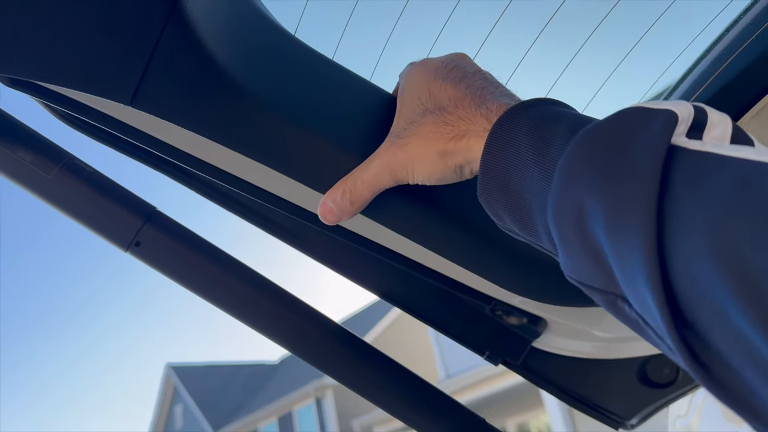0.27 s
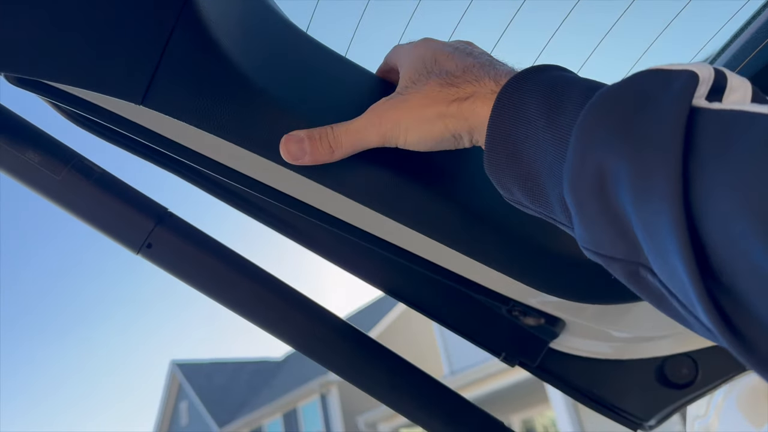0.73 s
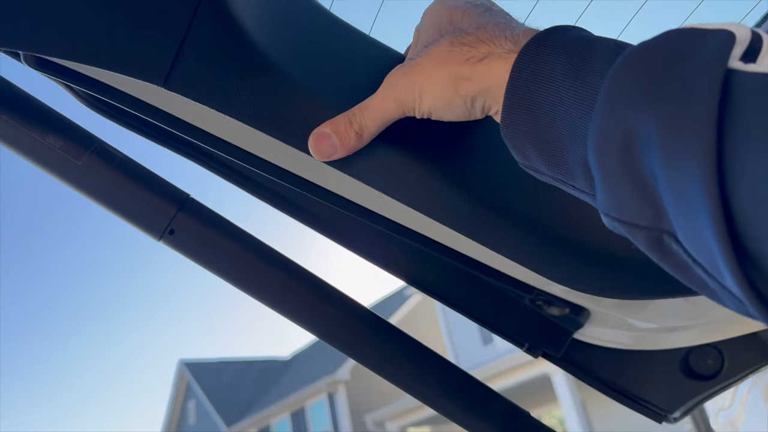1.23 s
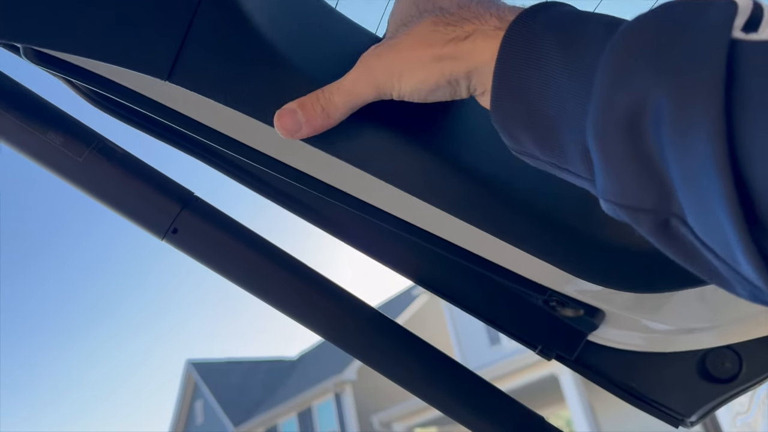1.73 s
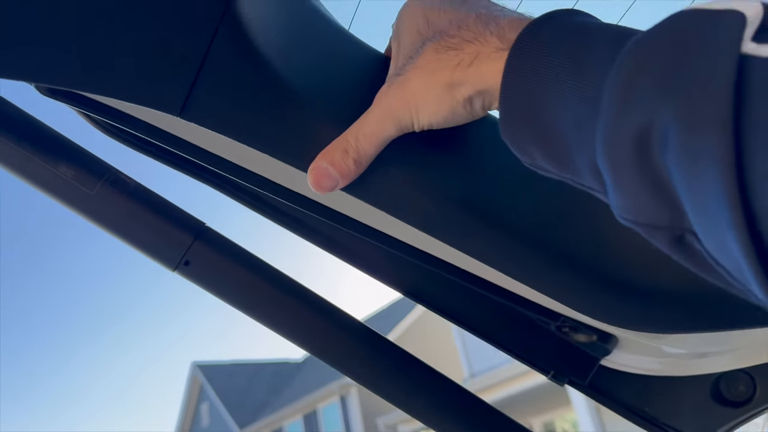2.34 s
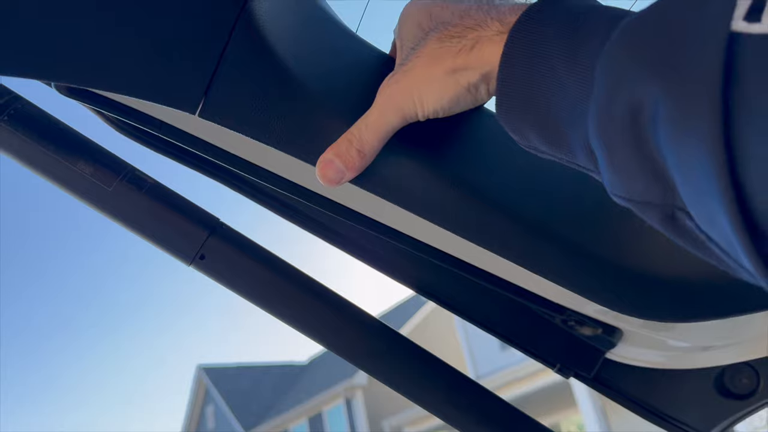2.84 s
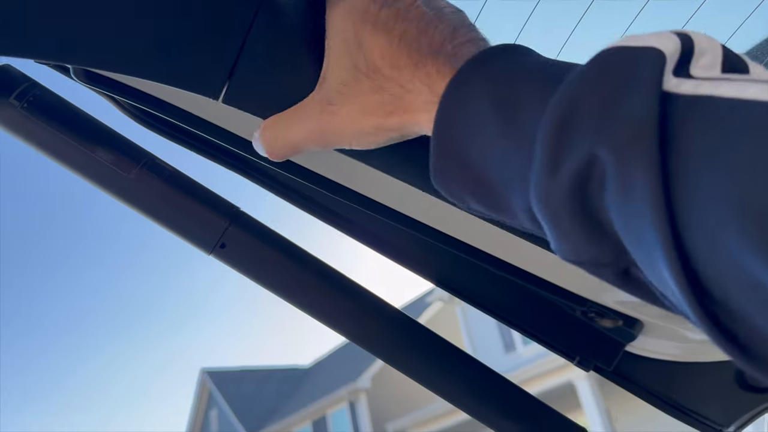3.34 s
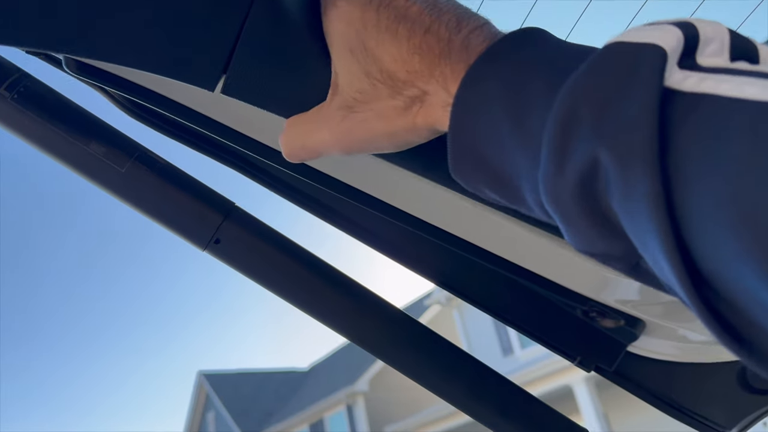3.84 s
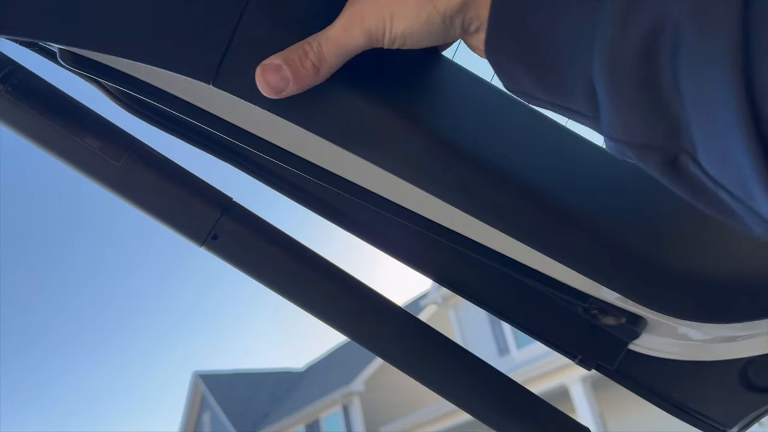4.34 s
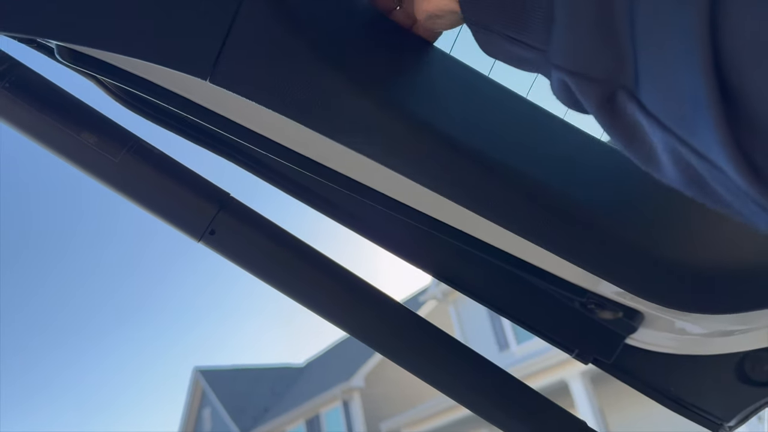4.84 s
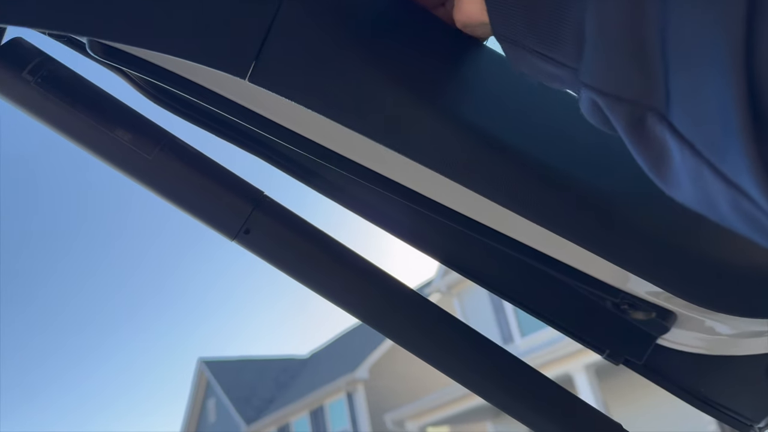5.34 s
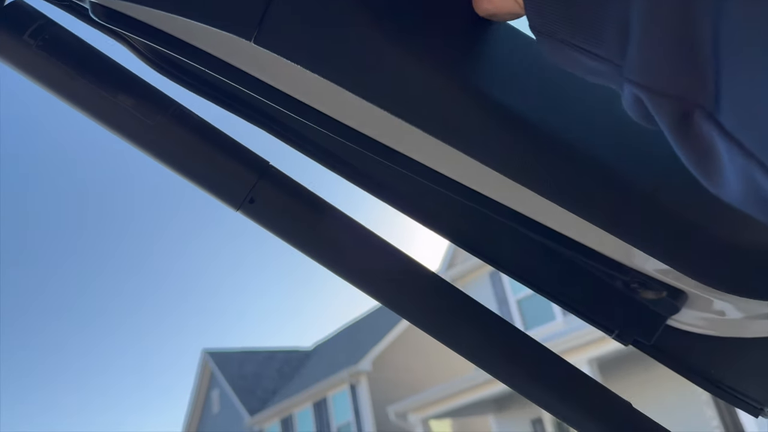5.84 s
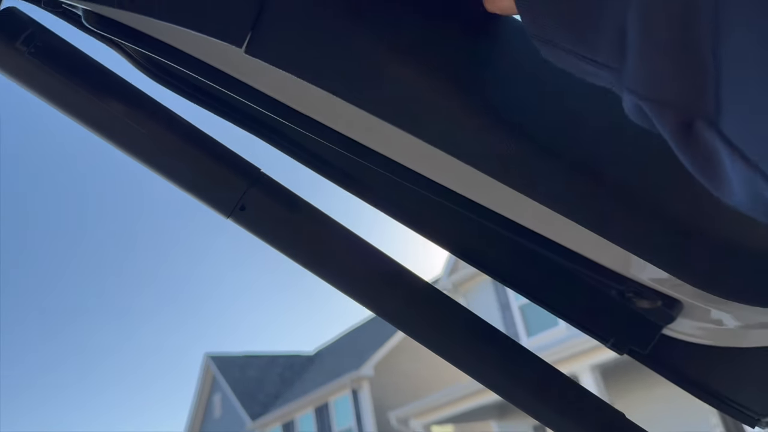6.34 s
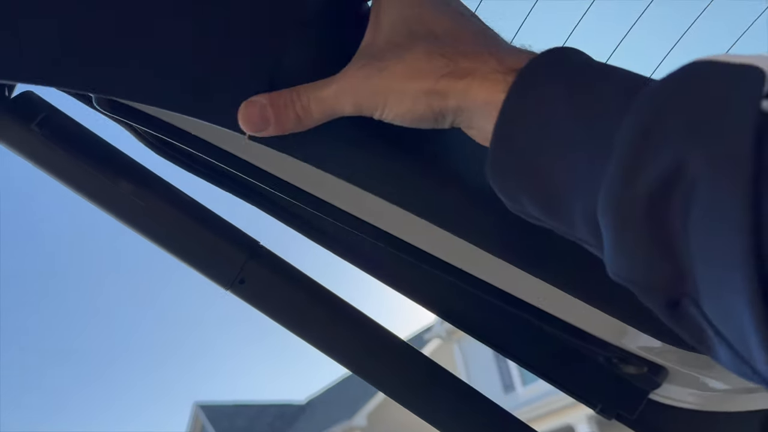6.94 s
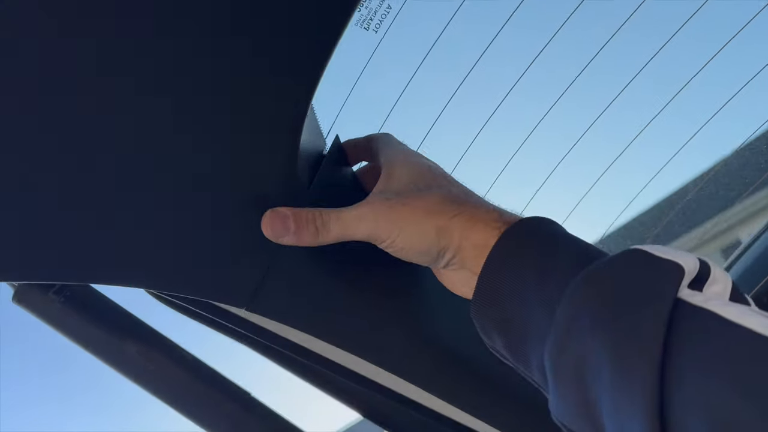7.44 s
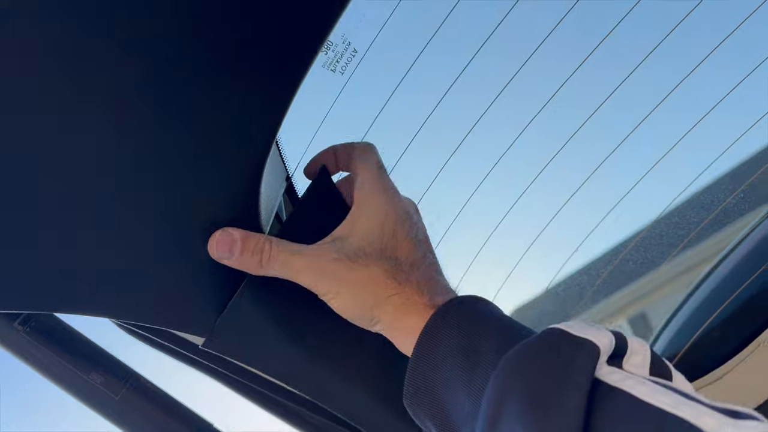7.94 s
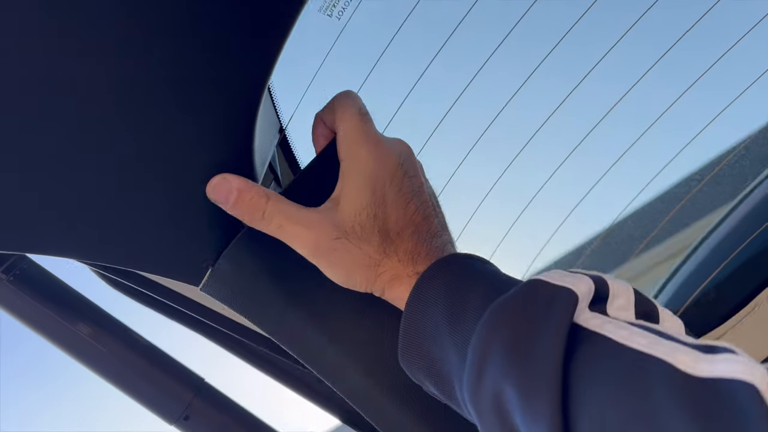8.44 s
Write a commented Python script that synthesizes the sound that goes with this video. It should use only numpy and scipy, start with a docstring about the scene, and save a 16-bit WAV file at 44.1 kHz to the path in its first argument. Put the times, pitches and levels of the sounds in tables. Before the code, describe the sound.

Very close in a small padded vehicle interior, over an almost silent low street bed, fingers rub grained plastic. Two tiny bright ticks come at 0.1 s, then light clacks at 0.5-0.7. Around 1.5 a cluster of creaky clicks, and near 1.9-2.1 dull bumps and low grip rumble. At 2.5 a firm hollow snap booms through the panel. Finger drags and sleeve rustle continue from 2.7 to 4.6, with small clicks and a crisper clack at 4.16. A strong tight burst of snaps hits at 5.2; after a quieter spell, the loudest sharp double crack lands at 6.16-6.19. From 7.1 heavy low thuds and fluttering rumble dominate, with a strong clack at 7.76 and knocks around 8.2-8.3. Two extremely faint high chirps appear at 8.4 and 8.5, beside last small clicks at 8.6. Echoes die almost instantly.

```python
"""Clips creak and snap free as a hand pries a plastic trim panel off the inside of a car's tailgate, close by.
Each snap is a noise crack, a damped clack and ringing modes; bumps swing the panel, clicks and ticks are its creaks.
Fingers and sleeve are grains of filtered noise, and the grip rumbles with each heave in thuds and low flutter.
The small padded cabin answers the blows briefly over a quiet street; two faint chirps come at the end."""
import sys
import numpy as np
from scipy import signal
from scipy.fft import rfft, irfft, next_fast_len
from scipy.io import wavfile

SR = 44100
rng = np.random.default_rng(int(sys.argv[2]) if len(sys.argv) > 2 else 0)


def put_to_file(sound):
    """Save the sound as 16-bit audio at rate SR, in the file named by the first command-line argument."""
    columns = np.atleast_2d(sound).T  # one column per channel
    safe = np.clip(columns, -1, 1)
    whole_steps = np.round(safe * 32767)
    wavfile.write(sys.argv[1], SR, whole_steps.astype(np.int16))


N = 382964
SIZE = next_fast_len(N + SR // 2, real=True)  # transform length with room for the tail
BINS = np.fft.rfftfreq(SIZE, 1 / SR)


def gain_of(db):
    """Decibels to amplitude."""
    return 10 ** (np.asarray(db) / 20)


def evened(x):
    """Scales to rms 1."""
    return x / np.sqrt(np.mean(x ** 2) + 1e-20)


def read(points, hz):
    """A table's value on a log-frequency axis."""
    f, value = np.transpose(points)
    return np.interp(np.log(hz + 1), np.log(f + 1), value)


def coloured(x, spectrum):
    """Filters x with a spectrum table."""
    size = next_fast_len(x.shape[-1], real=True)
    gain = gain_of(read(spectrum, np.fft.rfftfreq(size, 1 / SR)))
    return irfft(rfft(x, size) * gain, size)[..., :x.shape[-1]]


def add(mix, s, sound):
    """Mixes a sound in at time s."""
    part = mix[max(round(s * SR), 0):][:len(sound)]
    part += sound[:len(part)]


def wander(per_s):
    """A random drift of about unit size, heading for a new value so many times a second."""
    return np.interp(np.arange(N) / SR * per_s, np.arange(8192), rng.standard_normal(8192))


def ring(modes, t):
    """Struck modes that each die away exponentially, peak 1."""
    sound = np.zeros(len(t))
    for k, (hz, db, t60) in enumerate(modes):
        sound += (-1) ** k * gain_of(db - 60 * t / t60) * np.sin(2 * np.pi * hz * t)
    return sound / abs(sound).max()


def flex(t, hz, cycles):
    """A heavily damped swing whose envelope peaks after so many cycles."""
    u = t * hz / cycles
    return u * np.exp(1 - u) * np.sin(2 * np.pi * hz * t)


# tone of the street bed, relative: (frequency [Hz], level [dB])
STREET_TONE = [(20, -30.5), (55, 9), (130, -20.5), (300, -8.5), (800, -22), (2000, -30), (4000, -43),
               (7000, -50), (10000, -53), (16000, -78)]


def quiet_street(level_db=-54):
    """The bed: steady noise, unlike in its two channels, shaped by the street's spectrum."""
    return gain_of(level_db) * evened(coloured(rng.standard_normal((2, N)), STREET_TONE))


# thin far chirps, perhaps a bird outside: (start [s], length [s], level [dB])
CHIRP_CUES = [(8.369, .065, -71), (8.457, 0.082, -73)]


def chirps(top_hz=6050, top_at=0.42, droop=0.71, quaver=0.024):
    """Each chirp is a quavering near sine that rises a little and then falls."""
    out = np.zeros(N)
    for s, length, db in CHIRP_CUES:
        along = np.arange(0, 1, 1 / (length * SR))
        arc = 1 - droop * (along - top_at) ** 2
        hz = top_hz * (arc + quaver * wander(per_s=900)[:len(along)])
        swell = np.sin(np.pi * along) ** .5
        add(out, s, gain_of(db) * swell * np.sin(2 * np.pi * np.cumsum(hz) / SR))
    return out


# how long the padded cabin rings: (frequency [Hz], t60 [s])
CABIN_DECAY = [(100, 0.2), (260, 0.26), (700, 0.046), (1800, 0.057), (5000, 0.059), (13000, 0.04)]
# how strongly it answers: (frequency [Hz], level [dB])
CABIN_LEVEL = [(100, -0.5), (400, -2.5), (1000, -1.5), (3000, 0.5), (9000, 0)]


def cabin(x):
    """Dense early reflections that the upholstery soon swallows; rows: shared sound, unlike sound."""
    count = SR // 2
    taps = rng.choice([-1., 1.], (2, count)) * (rng.random((2, count)) < .15)
    taps[:, :round(.0025 * SR)] = 0  # no reflection in the first 2.5 ms
    hz, t, z = signal.stft(taps, SR, nperseg=128)
    fade = gain_of(-60 * t / read(CABIN_DECAY, hz)[:, None])
    fade *= gain_of(read(CABIN_LEVEL, hz))[:, None] / np.sqrt(np.mean(fade ** 2, axis=1, keepdims=True))
    tail = signal.istft(z * fade, SR, nperseg=128)[1] / np.linalg.norm(taps[0])
    tail[0, 0] += 1  # the direct path
    return signal.fftconvolve(x[None], tail, axes=1)[:, :N]


# stereo width, the share of unlike sound: (frequency [Hz], level [dB])
WIDTH = [(60, -7), (600, -7), (1500, -2), (5000, -1), (8000, -12), (15000, -17)]
# stereo balance: (frequency [Hz], left over right [dB])
BALANCE = [(100, 0.2), (2000, 0), (3500, 2), (5500, 8), (8000, 0), (15000, -0.5)]
# stereo phase: (frequency [Hz], left leads by [rad])
PHASE_LEAD = [(0, 0), (1500, -.3), (3100, 1.8), (4900, .1), (8000, 0), (9500, -np.pi), (15600, -5 * np.pi),
              (17000, -5 * np.pi)]


def ports(x):
    """Two microphone ports: in step in the bass, far out of step in the treble."""
    shared, unlike = rfft(x, SIZE)
    unlike = unlike * gain_of(read(WIDTH, BINS))
    lead = np.interp(BINS, *np.transpose(PHASE_LEAD))
    turn = gain_of(read(BALANCE, BINS) / 2) * np.exp(.5j * lead)  # half to each side
    return irfft(np.array([(shared + unlike) * turn, (shared - unlike) / turn]), SIZE)[:, :N]


def moves(rows, axis, attack_s, release_s, arch_db):
    """Gain over time from one dB column: each move sets in, arches midway, builds or eases off, and dies away."""
    now, power = np.arange(N) / SR, np.zeros(N)
    for row in rows:
        start, length, *_, swell_db = row
        span = slice(max(int(start * SR), 0), int((start + length + 6 * release_s) * SR))
        t = now[span] - start
        along = np.clip(t / length, 0, 1)
        arch = arch_db * (np.sin(np.pi * along) - 2 / np.pi)
        db = row[axis] + arch + swell_db * (along - .5)
        edges = np.clip(t / attack_s, 0, 1) * np.exp(-np.maximum(t - length, 0) / release_s)
        power[span] += (gain_of(db) * edges) ** 2
    return np.sqrt(power)


def jolts(jolt_db, settle_s):
    """Gain over time: a snap jerks the hand in proportion to its clack, and it soon settles."""
    t, out = np.arange(SR // 2) / SR, np.zeros(N)
    for s, clack, *_ in SNAP_CUES:
        add(out, s, gain_of(clack + jolt_db) * np.exp(-t / settle_s))
    return out


# strokes of the hand along the trim:
# (start [s], length [s], fingertips [dB], sleeve [dB], swell from start to end [dB])
STROKE_CUES = [(0.0, 0.12, -70.5, -68.5, -14), (0.25, 0.037, -82, -62, 8), (0.42, 0.18, -53, -71, -17),
               (0.56, 0.082, -54.5, -69, 16), (0.65, 0.08, -59, -57, -1), (0.73, 0.27, -60.5, -72, 0),
               (1.29, 0.07, -60, -97.0, 12), (1.44, 0.14, -46.0, -60.5, 10.5), (1.56, 0.18, -70, -71.5, 17),
               (1.81, 0.11, -54, -67, -5), (1.99, 0.098, -55, -75, 8), (2.41, 0.021, -52, -64, 10),
               (2.68, 0.15, -51.0, -77, 18), (2.92, 0.14, -50.5, -57.0, -3), (3.06, 0.28, -56.5, -62, -21),
               (3.21, 0.048, -49.5, -48.5, 7.5), (3.43, 0.47, -65.5, -71.5, -15.5),
               (3.69, 0.11, -68.5, -63.5, 10), (3.85, 0.15, -49, -66, 15), (3.97, 0.23, -49.5, -52, 5),
               (4.18, 0.13, -52.5, -60.5, -6.5), (4.35, 0.064, -52.5, -54.5, 12),
               (4.45, 0.062, -48.5, -53.5, 21), (4.57, 0.22, -53.5, -58, -7.0),
               (4.77, 0.38, -71, -70.5, 2.5), (5.39, 0.27, -60, -72, -4.5), (5.61, 0.074, -54, -53, 11),
               (5.72, 0.13, -68.5, -77, 32), (5.87, 0.34, -58, -77.5, 14), (6.33, 0.13, -56.5, -70, -6),
               (6.44, 0.14, -57, -57, 14), (6.68, 0.33, -50, -59, -3), (6.93, 0.06, -45.5, -55, -7),
               (7.08, 0.31, -53.5, -71, 0), (7.34, 0.17, -62, -57.5, 4.5), (7.55, 0.11, -52.5, -61.5, 15),
               (7.7, 0.12, -47.5, -62, 5), (7.94, 0.18, -57, -66.5, 14.5), (8.12, 0.22, -50.5, -55, -2.5),
               (8.35, 0.18, -62.5, -76, 5), (8.54, 0.16, -63.5, -96.0, 7)]
# heaves, as the hand loads the panel or changes its grip:
# (start [s], length [s], rumble [dB], swell from start to end [dB])
HEAVE_CUES = [(0.04, 0.18, -51, 15), (0.35, 0.35, -38, 2.5), (0.82, 0.26, -41, -6), (1.27, 0.19, -41.5, -8),
              (1.5, 0.45, -40, 4), (1.93, 0.091, -28, 0), (2.04, 0.12, -32.0, -1.5),
              (2.38, 0.068, -34.5, 23), (2.51, 0.27, -39, 5), (2.84, 0.065, -29.5, -7),
              (3.07, 0.24, -35, -8), (3.64, 0.2, -44.5, 21), (3.85, 0.41, -36, -4.5),
              (4.17, 0.14, -32.5, 5), (4.42, 0.25, -41, 10), (4.9, 0.11, -29, 7), (5.18, 0.08, -30.5, -18),
              (5.49, 0.22, -47.5, -20), (5.83, 0.42, -42.5, -17), (6.16, 0.41, -42, -18),
              (6.46, 0.28, -43.5, 5), (6.76, 0.37, -42, -23), (7.11, 0.3, -25.5, 11.5),
              (7.41, 0.2, -25, 3.5), (7.62, 0.36, -27, 13), (7.99, 0.39, -28.5, -4.5),
              (8.33, 0.31, -30.5, 2)]


def hand(drag_rest_db=-65, brush_rest_db=-80.5, grip_rest_db=-49.5):
    """How hard the fingertips drag, the sleeve brushes and the grip works: three gains, never quite at rest."""
    uneven = gain_of(1.5 * wander(per_s=25))
    drag = moves(STROKE_CUES, axis=2, attack_s=0.021, release_s=0.016, arch_db=2.5) * uneven
    brush = moves(STROKE_CUES, axis=3, attack_s=0.035, release_s=.018, arch_db=5) * uneven
    grip = moves(HEAVE_CUES, axis=2, attack_s=0.041, release_s=0.022, arch_db=1)
    drag = np.hypot(drag, gain_of(drag_rest_db) + jolts(jolt_db=-35, settle_s=.018))
    brush = np.hypot(brush, gain_of(brush_rest_db) + jolts(jolt_db=-48, settle_s=.018))
    grip = np.hypot(grip, gain_of(grip_rest_db) + jolts(jolt_db=-31, settle_s=.03))
    return drag, brush, grip


# tone of the low flutter, relative: (frequency [Hz], level [dB])
FLUTTER_TONE = [(15, -48.5), (30, -22.5), (50, -2.5), (75, -1.5), (130, -6.5), (200, -12.5), (350, -18.5),
                (600, -47), (3000, -71.5)]
# where the hand leans, as the middle pitch of its thuds: (time [s], pitch [Hz])
LEANING_PITCH = [(1.5, 101.2), (3.1, 125.6), (3.7, 109), (4.199, 170), (6.9, 151), (7.301, 101.4),
                 (8.2, 162)]


def rumble(grip, rumble_db=-8, thuds_db=-4, cycles=0.78, size_db=4, thuds_per_s=30):
    """The grip shifts in small dull thuds; the deeper they are, the more low flutter lies under them."""
    t, thuds = np.arange(SR // 8) / SR, np.zeros(N)
    hz = np.interp(np.arange(N) / SR, *np.transpose(LEANING_PITCH))
    for k, (late, size, pitch) in enumerate(rng.random((thuds_per_s * N // SR, 3))):
        s = (k + late) / thuds_per_s
        thud_hz = hz[int(s * SR)] * 2 ** (2 * pitch - 1)  # up to an octave either way
        add(thuds, s, gain_of(size_db * (2 * size - 1)) * flex(t, thud_hz, cycles))
    flutter = evened(coloured(rng.standard_normal((2, N)), FLUTTER_TONE))
    flutter = flutter * gain_of(4.2 * wander(per_s=30)) * hz.mean() / hz
    shared_thuds = np.outer([1, 0], evened(thuds))
    return (gain_of(rumble_db) * flutter + gain_of(thuds_db) * shared_thuds) * grip


def friction(spectrum, grains_per_s, grain_db, smooth):
    """Many tiny slips of uneven size over a smooth hiss."""
    struck = rng.exponential(1, N), rng.random(N) < grains_per_s / SR
    sizes = gain_of(grain_db * np.minimum(struck[0], 4)) * struck[1]
    fade = np.exp(-1 / (0.0076 * SR))  # slip power dies away with a 7.6 ms time constant
    slips = evened(signal.lfilter([1], [1, -fade], sizes ** 2) ** .5)
    return evened(coloured(rng.standard_normal((2, N)) * (slips + smooth), spectrum))


# tone of fingertips on grained plastic, relative: (frequency [Hz], level [dB])
FINGER_TONE = [(100, -20.5), (350, 4), (800, 4), (1100, -6), (1600, -11), (2600, -16.5), (4000, -27),
               (5300, -26), (7000, -34.5), (15000, -57.5)]
# tone of the sleeve's rustle, relative: (frequency [Hz], level [dB])
SLEEVE_TONE = [(300, -16.5), (1500, 14), (3500, 7), (5200, 6.5), (6800, 2.5), (8500, 11), (10000, 12.5),
               (12500, 8), (15300, 8.5), (16500, 2.5)]


def rubbing(drag, brush, fingers_db=-3, sleeve_db=-1):
    """Fingertips drag over the grained plastic and the sleeve brushes along."""
    fingers = friction(FINGER_TONE, grains_per_s=110, grain_db=2.5, smooth=0.8) * drag
    sleeve = friction(SLEEVE_TONE, grains_per_s=220, grain_db=3.5, smooth=0.21) * brush
    return gain_of(fingers_db) * fingers + gain_of(sleeve_db) * sleeve


# tiny bright ticks of stressed plastic: (time [s], level before trim [dB], pitch [Hz])
TICK_CUES = [(0.067, -34, 5590), (0.086, -27.5, 5600), (1.4964, -33, 5540), (2.08, -41.5, 5760),
             (2.0956, -38, 5270), (2.416, -43, 4370), (2.424, -38.5, 3930), (2.4344, -36, 3740),
             (2.448, -48, 3720)]


def ticks(trim_db=2, cycles=2.5, scatter_db=-19, scatter_s=0.0075):
    """A gritty slip and a few weaker ones after it, each ringing a small stiff edge close to the microphone."""
    t, out = np.arange(SR // 20) / SR, np.zeros(N)
    for s, db, hz in TICK_CUES:
        fade = np.exp(-t / .0009) + gain_of(scatter_db) * np.exp(-t / scatter_s)
        slips = rng.standard_normal(len(t)) * fade
        edge = np.exp(-t * hz / cycles) * np.cos(2 * np.pi * hz * t)
        tick = signal.fftconvolve(slips, edge)
        add(out, s, gain_of(db + trim_db) * tick / abs(tick).max())
    return out


def crackle(drag, level_db=-3, slips_per_s=200, size_db=6.5, cycles=0.32, grit=0.038):
    """Under strain the plastic sticks and slips in small clicks of uneven size and pitch."""
    t, out = np.arange(SR // 60) / SR, np.zeros(N)
    for place, size, pitch in rng.random((round(slips_per_s * N / SR), 3)):
        click = flex(t, 450 * 6 ** (pitch ** 2), cycles)  # 450 to 2700 Hz, mostly low
        click += grit * rng.standard_normal(len(t)) * np.exp(-t / 0.00037)
        add(out, place * N / SR, gain_of(size_db * min(-np.log(1 - size), 3)) * click)
    return gain_of(level_db) * evened(out) * drag


# the panel's low bending modes: (frequency [Hz], relative level [dB], t60 [s])
PANEL_MODES = [(113.2, -3.5, 0.26), (180, 5.5, 0.11), (263.7, 2, 0.06), (327.6, 7, 0.059),
               (387.4, 6.5, 0.048), (491.7, 3.5, 0.078), (571, -9.5, 0.089), (740, -13.5, 0.037),
               (870, -3, 0.049)]


def panel_boom(t, stretch, rise_s):
    """The whole panel bends in its low modes and takes a moment to speak."""
    return ring(PANEL_MODES, t * stretch) * (1 - np.exp(-t / rise_s))


# dull bumps of the hand and the loose panel: (time [s], level before trim [dB], pitch [Hz])
BUMP_CUES = [(0.619, -21, 216), (1.866, -24.5, 79.4), (1.949, -18.5, 113), (1.995, -25.5, 134),
             (2.09, -31.5, 72), (2.299, -32, 95), (2.427, -35.5, 84.7), (2.447, -23.5, 60),
             (2.521, -18, 202), (3.134, -23, 207), (4.278, -24.5, 143), (4.322, -27.5, 95),
             (4.947, -21.5, 128), (4.986, -24, 78.6), (5.207, -9, 316), (5.238, -15, 182),
             (5.886, -23.5, 157), (6.185, -5.5, 404), (6.221, -21, 122.6), (6.392, -24.5, 119.2),
             (7.188, -18, 70.6), (7.201, -9.5, 177), (7.294, -13.5, 89), (7.375, -14.5, 78.3),
             (7.596, -21, 186), (7.641, -18, 332), (7.766, -14.5, 230), (7.86, -18.5, 152),
             (8.181, -10.5, 150), (8.236, -15, 137), (8.276, -14, 195), (8.526, -26.5, 248)]


def bumps(trim_db=-2, cycles=0.61, panel_db=-8):
    """Soft pushes that swing the panel a few times."""
    t, out = np.arange(SR // 4) / SR, np.zeros(N)
    body = gain_of(panel_db) * panel_boom(t, stretch=1, rise_s=0.0024)
    for s, db, hz in BUMP_CUES:
        add(out, s, gain_of(db + trim_db) * (flex(t, hz, cycles) + body))
    return out


# the stiff plastic round a clip, before each snap varies it: (frequency [Hz], relative level [dB], t60 [s])
RIB_MODES = [(830, -16.5, 0.037), (1346, -7, 0.014), (1610, -7.5, 0.017), (1900, -6.5, 0.0052),
             (2320, -7, 0.0092), (2910, -12, 0.0099), (3115, -7.5, 0.0053)]
# tone of the sharp crack, relative: (frequency [Hz], level [dB])
CRACK_TONE = [(300, -15), (1200, -1), (2500, 1), (4000, 0), (6800, -5), (8700, 2), (10000, 1), (12000, -3),
              (14500, -1)]
# clips snapping and edges catching, levels before trim:
# (time [s], clack [dB], clack pitch [Hz], ring of the ribs [dB], sharp crack [dB], panel boom [dB])
SNAP_CUES = [(0.469, -33, 730, -40, -54, -37.5), (0.596, -51, 1360, -30.5, -32.5, -48),
             (0.625, -32, 586, -49, -64, -22), (0.698, -40, 980, -73, -34, -60),
             (1.472, -28.5, 700, -59, -51, -33), (1.492, -53, 800, -33.5, -47, -26),
             (1.53, -43, 895, -53, -60, -39), (1.556, -28, 770, -35, -47, -33),
             (1.866, -26, 800, -33.5, -39.5, -26.5), (2.026, -51, 1130, -32.5, -36, -42),
             (2.081, -48, 1290, -38.5, -61, -47), (2.416, -43, 555, -42, -48, -30),
             (2.519, -14, 750, -23, -44, -6), (2.548, -27.5, 1400, -36, -58, -45),
             (2.707, -35, 577, -52, -59, -37), (2.73, -25.5, 660, -62, -70, -23.5),
             (2.781, -57, 872, -34, -45, -31), (2.995, -33, 840, -42, -55, -24),
             (3.551, -37.5, 640, -50.5, -76, -25.5), (3.945, -33, 670, -33, -63, -23),
             (3.961, -32.5, 736, -32, -51, -27), (4.057, -34, 740, -39, -46, -25),
             (4.127, -52, 1350, -28.5, -40, -23.5), (4.159, -19, 720, -24, -33.5, -47),
             (4.195, -44, 713, -52, -40, -25), (4.456, -53, 700, -43, -39, -53),
             (4.48, -26, 830, -22.5, -30, -21), (4.609, -33.5, 920, -35.5, -59, -29),
             (4.856, -54, 934, -45, -38.5, -51), (5.202, -14.5, 602, -17, -25, -28),
             (5.208, -12, 735, -52, -62, -12.5), (5.22, -19.5, 660, -23.5, -27.5, -15),
             (5.665, -39, 800, -47, -69, -30), (5.931, -37, 1000, -61.5, -83, -47.5),
             (5.947, -39.5, 1100, -55, -81, -50.5), (6.117, -37.5, 900, -49.5, -68.5, -42.5),
             (6.158, -4.5, 735, -15.5, -20.5, -17), (6.169, -27, 900, -21.5, -30, -38),
             (6.181, -8, 770, -6, -18.5, -18.5), (6.187, -18, 580, -43, -49.5, -3.5),
             (6.435, -63, 780, -41, -43.5, -33), (6.946, -53, 1410, -29, -37.5, -25),
             (7.127, -37, 657, -42, -47.5, -32), (7.394, -23, 767, -30.5, -47, -15.5),
             (7.633, -39, 910, -42, -51.5, -17), (7.756, -9, 810, -19, -39.5, -11),
             (8.172, -48, 552, -37, -46, -20), (8.272, -18, 614, -53, -44, -20),
             (8.296, -25.5, 750, -21, -21, -16.5), (8.574, -38.5, 673, -57.5, -82, -23),
             (8.637, -38, 775, -43.5, -75, -32)]


def snaps(clack_db=0, crack_db=2, boom_db=-2, ribs_db=2, cycles=0.88, crack_s=0.001, boom_rise_s=0.0036,
          spread=0.083, place_db=3):
    """A barb slips with a crack, the plastic round it clacks and rings, and the whole panel booms a moment later."""
    t, out = np.arange(SR // 4) / SR, np.zeros(N)
    for s, clack, hz, ribs, crack, boom in SNAP_CUES:
        stretch = 1 + spread * (2 * rng.random() - 1)  # the hand's pressure shifts the modes a little
        favour = place_db * rng.standard_normal(len(RIB_MODES))  # each spot favours other modes
        struck = np.array(RIB_MODES) + np.outer(favour, [0, 1, 0])
        slip = coloured(rng.standard_normal(len(t)) * t * np.exp(-t / crack_s), CRACK_TONE)
        slip /= np.sqrt(np.sum(slip ** 2) / (crack_s * SR))
        body = panel_boom(t, stretch, boom_rise_s)
        add(out, s - crack_s, gain_of(crack + crack_db) * slip)  # the slip starts just before the blow
        add(out, s, gain_of(ribs + ribs_db) * ring(struck, t * stretch))
        add(out, s, gain_of(clack + clack_db) * flex(t, hz, cycles))
        add(out, s, gain_of(boom + boom_db) * body)
    return out


def scene():
    """Blows ring in the cabin over rubbing, rumble and the quiet street."""
    quiet = quiet_street()
    drag, brush, grip = hand()
    blows = snaps() + crackle(drag) + bumps()
    # each spot on the panel reaches the two ports at its own angle, which shifts their phase apart
    aslant = .9 * np.tanh(2 * wander(per_s=5)) * signal.hilbert(blows, SIZE).imag[:N]
    direct = np.array([ticks() + chirps(), aslant])  # rows: shared sound, unlike sound
    return ports(cabin(blows) + direct + rubbing(drag, brush) + rumble(grip) + quiet)


def record(dry, ceiling=.9, edge_hz=16150):
    """The loudest snaps are rounded off just under full scale; then the band limit."""
    rounded = dry / (1 + (dry / ceiling) ** 6) ** (1 / 6)
    lowpass = signal.firwin(301, edge_hz, window=("kaiser", 8), fs=SR)
    return signal.oaconvolve(rounded, lowpass[None], "same", axes=1)


dry = scene()
out = record(dry)
put_to_file(out)
```